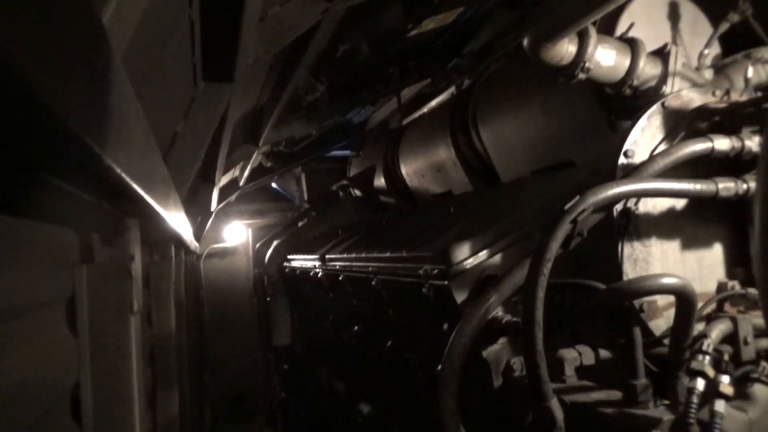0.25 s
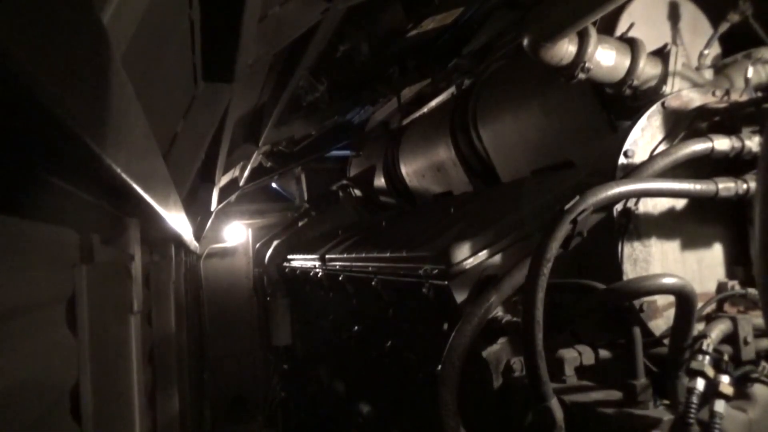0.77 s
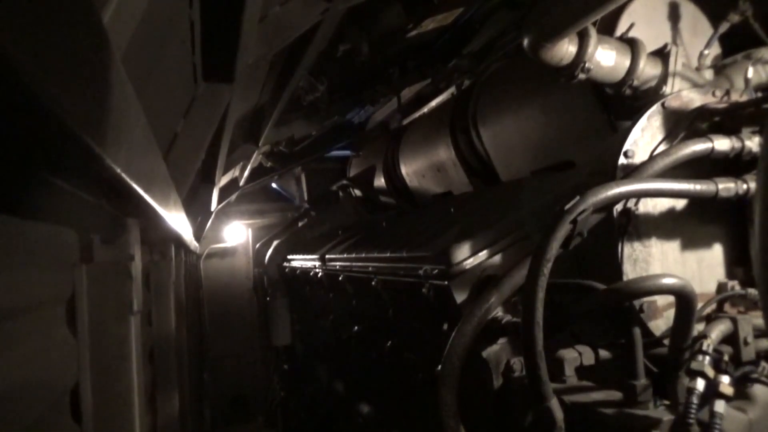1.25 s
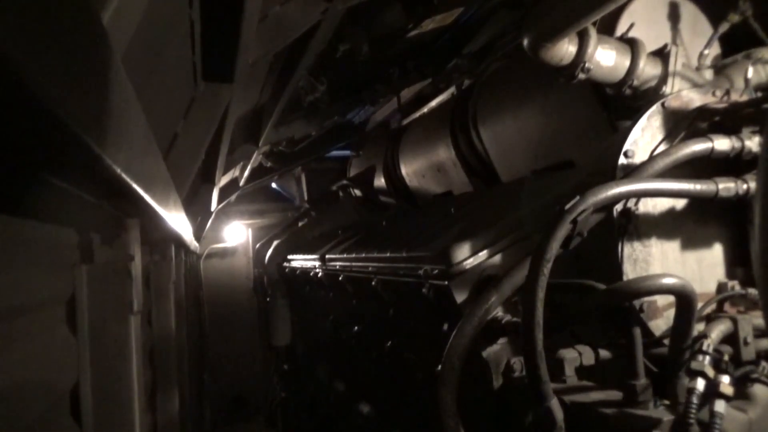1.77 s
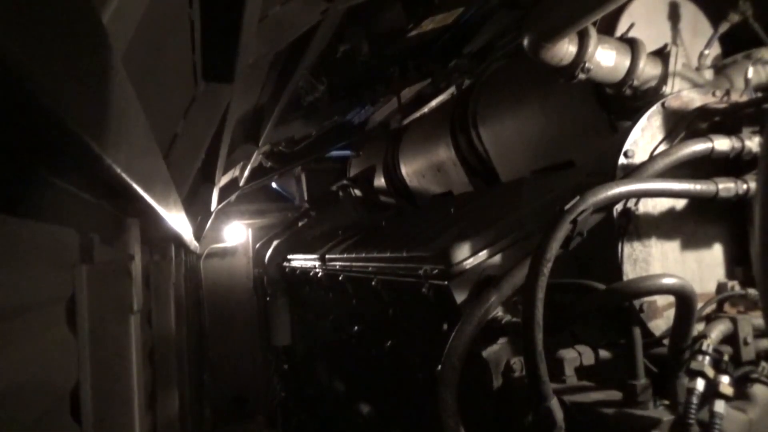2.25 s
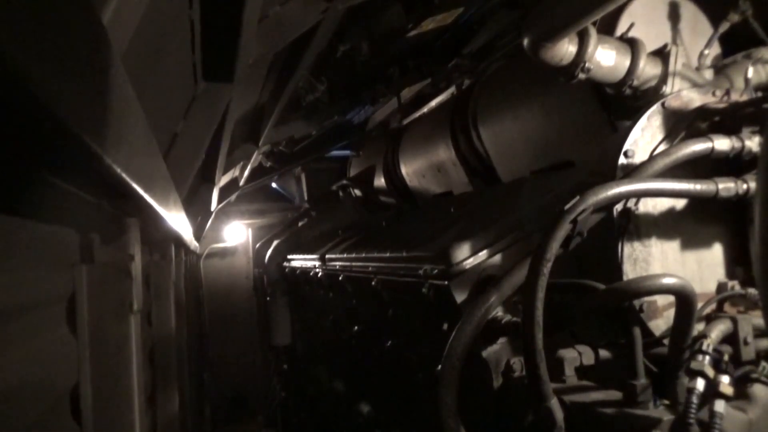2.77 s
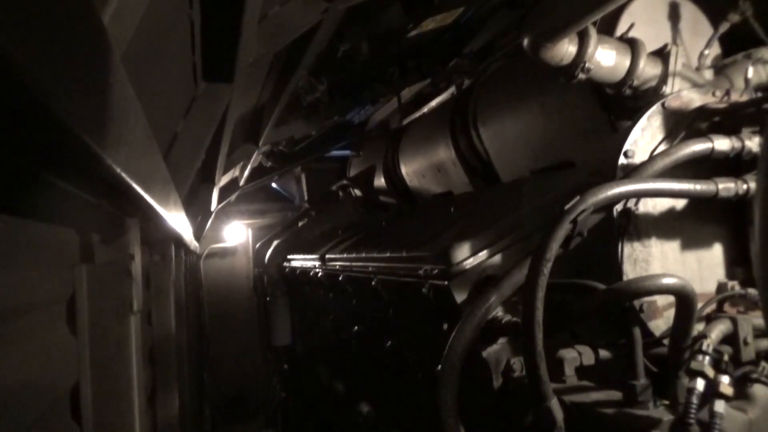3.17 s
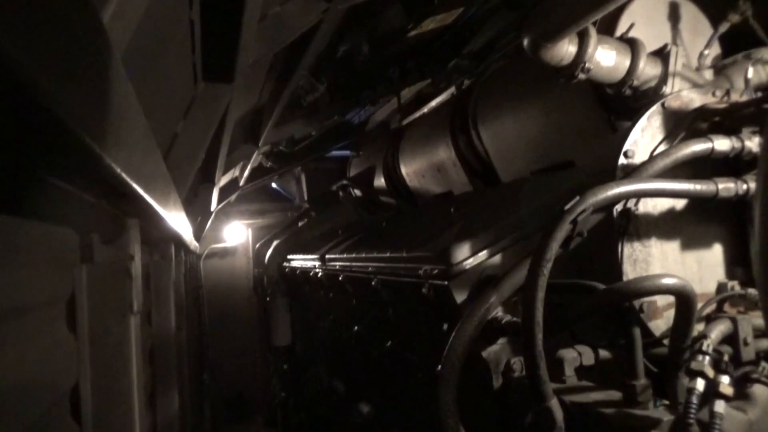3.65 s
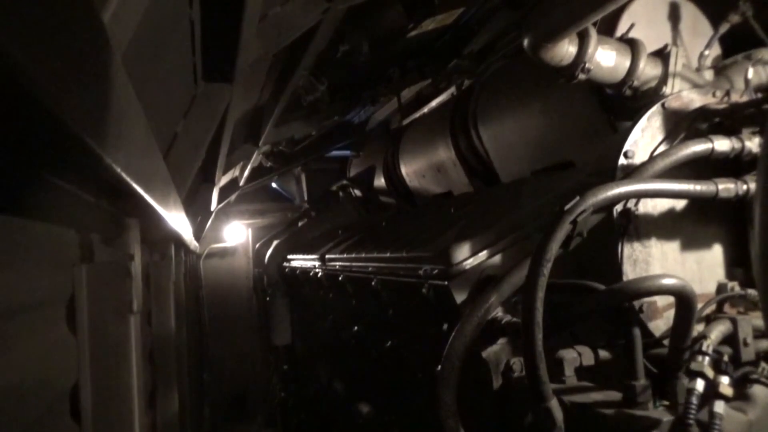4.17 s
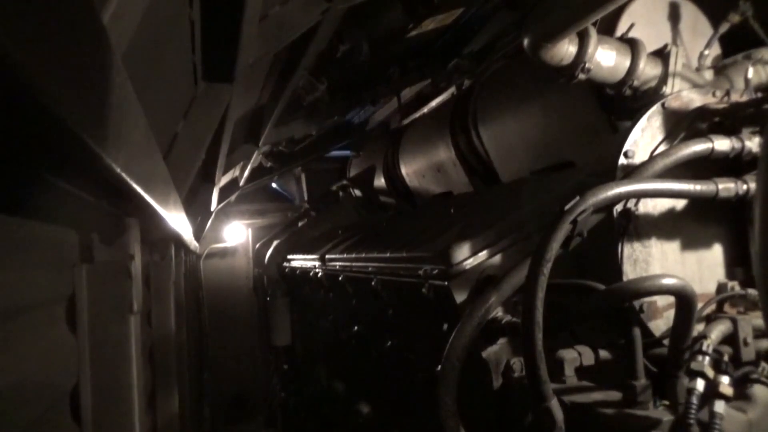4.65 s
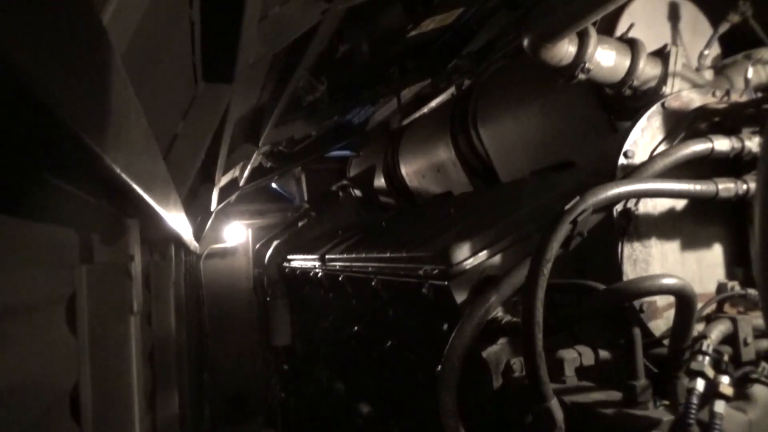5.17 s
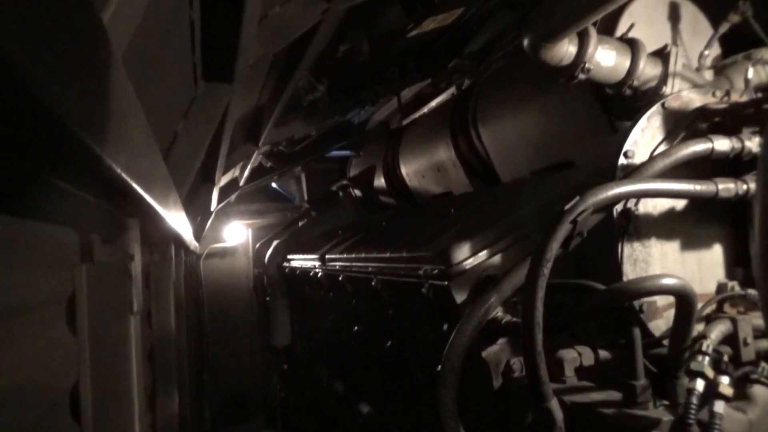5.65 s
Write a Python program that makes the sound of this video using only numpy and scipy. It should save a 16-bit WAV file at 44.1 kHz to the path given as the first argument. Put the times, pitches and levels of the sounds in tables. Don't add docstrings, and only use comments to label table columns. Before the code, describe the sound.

Inside a cramped steel engine room, a big diesel engine runs at constant speed. Its dense, buzzing mid-low drone pulses about eight times a second, with metallic clatter and rushing air between pulses. A thin, high blower whistle runs throughout, dipping briefly near the start, wavering, and growing strongest after four seconds. Faint pump whines sit beneath. A small close microphone sounds compressed, slightly muffled at the top, and never quiet.

```python
import sys
import numpy as np
from scipy import signal
from scipy.fft import irfft
from scipy.io import wavfile
from scipy.ndimage import uniform_filter1d

SR = 44100
rng = np.random.default_rng(int(sys.argv[2]) if len(sys.argv) > 2 else 0)


def level_to_linear(level):
    exponent = np.asarray(level, float) / 20
    return 10 ** exponent


def wav_record(signal):
    frames = np.transpose(np.atleast_2d(signal))
    bounded = np.clip(frames, -1, 1)
    quanta = np.round(bounded * 32767).astype(np.int16)
    wavfile.write(sys.argv[1], SR, quanta)


N = 260631

CYCLE_HZ = 8.1689
# f/Hz, lead/rad
LEAD = [(20, -1.2), (130, -0.5), (430, -1.01), (700, -1.05), (1000, -1.45), (1250, -.4), (1600, -.57),
        (4000, -.55), (6000, -.32), (11000, -.03)]
# f/Hz, difference/dB
LEAN = [(60, 0.0), (110, -0.5), (190, -1.0), (340, -0.3), (610, -0.5), (1080, 0.0), (1930, 0.0),
        (3450, 0.036), (6150, 0.09), (11000, 0.0)]
REGISTERS = [
    (16, 39),
    (39, 67),
    (67, 76),
    (75, 84),
    (84, 113),
    (67, 113),
]


def evened(x):
    return x / np.sqrt(np.mean(x ** 2) + 1e-20)


def read(points, hz):
    f, value = np.transpose(points)
    return np.interp(np.log(hz + 1), np.log(f + 1), value)


def around(steps, turns):
    return np.interp(turns, (np.arange(len(steps)) + .5) / len(steps), steps, period=1)


def drift(top_hz, count=30):
    t = np.arange(0, N + 64, 64) / SR
    slow = 0
    for f in np.geomspace(top_hz / 20, top_hz, count):
        slow = slow + np.sin(2 * np.pi * (f * t + rng.random())) / np.sqrt(f)
    return np.interp(np.arange(N) / SR, t, evened(slow))


def ports(lead_rad, lean_db):
    left = level_to_linear(lean_db / 2) * np.exp(.5j * lead_rad)
    return np.array([left, 1 / left]) / abs(left + 1 / left) * 2


def drone(turns, size=16384, scatter=.3):
    order = np.arange(size // 2 + 1)
    lines = order_levels(order) * np.exp(2j * np.pi * rng.random(len(order)))
    top = REGISTERS[-1][1]
    lines[:top] = settled(lines[:top])
    spread = scatter * np.clip(order / 130, 0, 1) ** 3
    lead_rad, lean_db = spread * rng.standard_normal((2, len(order)))
    hz = order * CYCLE_HZ
    placed = lines * ports(read(LEAD, hz) + lead_rad, read(LEAN, hz) + 3.6 * lean_db)
    angle = np.arange(size) / size
    hump = irfft(placed * (order < top))
    rattle = level_to_linear(1.3 * ducking(angle)) * irfft(placed * (order >= top))
    cycle = (hump + rattle) * size / np.sqrt(2)
    sound = np.array([np.interp(turns, angle, side, period=1) for side in cycle])
    return sound * level_to_linear(0.37 * drift(6.5))


def order_levels(order):
    hump_scatter_db, hump_top_order = 3., 300
    # f/Hz, level of one order/dB
    hump_colour = [(40, -69), (150, -54), (240, -56.5), (310, -46), (680, -40), (850, -45.5), (950, -55),
                   (2200, -66)]
    quiet_orders = [11, 12, 23, 35, 52, 58, 65, 91, 93, 98, 107, 112, 113, 124]
    # cycle order, level/dB
    standout_orders = [(9, -56), (18, -49), (24, -45), (25, -40), (28, -47), (32, -42), (33, -38), (34, -38),
                       (43, -41), (45, -39), (46, -36), (57, -37), (59, -34), (60, -35), (69, -35), (75, -34),
                       (76, -32), (81, -31), (84, -37), (85, -37), (89, -33), (90, -33), (99, -41), (101, -42),
                       (114, -43), (118, -47), (128, -53), (130, -49), (134, -50), (137, -45), (141, -51),
                   (143, -49), (146, -54), (167, -49), (192, -52), (194, -47), (199, -54), (200, -49),
                   (219, -57), (226, -52), (240, -51), (291, -60)]
    # cycle order, level/dB, order below/dB, order above/dB
    gear_orders = [
        (55, -38, -38, -32),
        (63, -34, -39, -38),
        (71, -30, -37, -32),
        (79, -23, -34, -24),
        (87, -26, -30, -31),
        (95, -36, -38, -44),
        (158, -39, -58, -60),
        (237, -51, -48, -47),
    ]
    uneven = np.clip(rng.standard_normal(len(order)), -2, 1)
    db = read(hump_colour, order * CYCLE_HZ) + hump_scatter_db * uneven
    db[quiet_orders] += -9
    for k, tone_db in standout_orders:
        db[k] = tone_db
    for k, *near_db in gear_orders:
        db[[k, k - 1, k + 1]] = near_db
    return level_to_linear(db) * (order >= 5) * (order < hump_top_order)


def settled(lines, size=256, count=24):
    # swells per cycle, depth/dB, crank angle of a swell/cycle
    throbs = [
        [(8, 2, 0), (3, 1.7, .183), (11, 1, .044), (10, 1, .089)],
        [(11, 1.9, .048), (14, 1.8, .067), (9, 1.8, .013), (8, 1.7, .014), (3, 1.6, .112), (2, 1.5, .485)],
        [(5, 2.3, .169), (1, 1.8, .021), (4, 1.4, .241), (9, 1.4, .024), (3, 1.3, .217)],
        [(1, 2.7, .363), (3, 2, .017), (2, 1.9, .067), (7, 1.4, .135)],
        [(14, 1.6, .018), (3, 1.4, .118), (8, 1, .11), (2, 1, .144)],
        [(7, 2.4, .132), (6, 1.6, .042), (16, 1.6, .018), (10, 1.6, .069), (11, 1.6, .075), (18, 1.2, .044),
         (1, 1.1, .307)],
    ]
    tries = lines * np.exp(2j * np.pi * rng.random((count, len(lines))))
    angle = np.arange(size) / size
    for _ in range(40):
        miss = np.zeros(count)
        for swells, (low, high) in zip(throbs, REGISTERS):
            wanted = evened(level_to_linear(throb(swells, angle))) * np.linalg.norm(lines[low:high]) / size
            wave = np.fft.ifft(tries[:, low:high], size)
            span = size // (2 * max(swells)[0])
            loud = np.sqrt(uniform_filter1d(abs(wave) ** 2, size=span, mode="wrap"))
            turned = np.fft.fft(wave * wanted / loud)[:, :high - low]
            tries[:, low:high] = abs(lines[low:high]) * np.exp(1j * np.angle(turned))
            miss += ((loud - wanted) ** 2).sum(1)
    return tries[np.argmin(miss)]


def throb(swells, turns):
    return sum(db * np.cos(2 * np.pi * k * (turns - at)) for k, db, at in swells)


def ducking(turns, size=512):
    grab_s, recover_turns = 0.0025, 0.11
    # crank angle/cycle, drop/dB
    trips = [
        (.03, -2.5),
        (.12, -1.1),
        (.23, -5.5),
        (.52, -2.6),
        (.67, -0.5),
        (.95, -2),
    ]
    angle = np.arange(size) / size
    db = sum(drop_db * np.exp(-((angle - at) % 1) / recover_turns) for at, drop_db in trips)
    grab = max(round(grab_s * CYCLE_HZ * size), 1)
    db = uniform_filter1d(db - db.mean(), size=grab, mode="wrap")
    return around(db, turns)


def rush(turns, patchy_db=0.5):
    # f/Hz, density/dB per Hz
    rush_colour = [(20, -78), (45, -86.5), (90, -72.5), (180, -63), (330, -64.5), (500, -55.5), (800, -56),
                   (1100, -65), (1700, -67), (2500, -69.5), (3600, -73.5), (4600, -77), (6000, -83),
                   (11000, -86)]
    # f/Hz, width/Hz, level over the rush/dB
    casings = [(189, 24, 4), (665, 136, 5), (951, 28, 7), (1112, 18, 9), (1305, 17, 14), (1930, 38, 7),
               (2090, 294, 5.5), (3840, 39, 6), (4120, 36, 9), (4202, 60, 8.5), (4340, 30, -10),
               (8380, 210, 6.5)]
    # f/Hz, shared power/1
    likeness = [(20, .7), (100, 0.74), (190, 0.8), (300, 0.38), (620, 0.96), (950, 0.93), (1250, 0.1),
                (1600, 0.8), (2200, 0.65), (3500, 0.77), (6000, 0.65), (9000, 0.78), (11000, 0.82)]
    frames, hz = N // 512 + 5, np.fft.rfftfreq(2048, 1 / SR)
    a, b, c, d, patches = rng.standard_normal((frames, len(hz), 5)).T
    patches = evened(uniform_filter1d(uniform_filter1d(patches, 20, 0), 4, 1))
    colour_db = read(rush_colour, hz)
    for f, width_hz, db in casings:
        colour_db = colour_db + db / (1 + ((hz - f) / (width_hz / 2)) ** 2)
    same = np.clip(read(likeness, hz), 0, 1)[:, None]
    shared = np.sqrt(same) * (a + 1j * b)
    apart = np.sqrt(1 - same) * (c + 1j * d)
    other = np.sqrt(1 - same) * np.roll(c - 1j * d, 7, 1)
    half = np.exp(.5j * read(LEAD, hz))[:, None]
    lean = level_to_linear(read(LEAN, hz) / 2)[:, None]
    z = np.array([(shared * half + apart) * lean, (shared / half + other) / lean])
    z *= level_to_linear(colour_db[:, None] + patchy_db * patches)
    noise = signal.istft(z, nperseg=2048, noverlap=1536)[1][:, :N]
    mid_power = np.sum(level_to_linear(2 * colour_db)) * hz[1]
    noise *= np.sqrt(mid_power / np.mean(noise.mean(0) ** 2))
    return noise * level_to_linear(1.6 * ducking(turns) + 0.35 * drift(30.) + .45 * drift(150.))


def blower(turns, sum_db=-65, double_db=-70):
    shaft_hz, blades = 95.69, 44
    partner_db, swell_at_turn = -45.5, -0.06
    flutter_hz, flutter_share, flutter_dip_s = 2.96, .4, .23
    below_start_db, below_rise_db_per_s = -48.5, 0.06
    # t/s, blade tone level/dB
    blade_effort = [(0, -40), (.3, -56), (.65, -40), (.95, -44.5), (1.2, -41), (1.45, -47), (1.65, -42.5),
                    (2.4, -42.5), (2.9, -39), (3.3, -47), (3.6, -40.5), (3.95, -43), (4.3, -37),
                    (4.55, -40.5), (5.0, -42), (5.3, -37), (5.55, -39), (5.91, -40)]
    # left lead/rad, left minus right/dB
    whistle_place = [
        (-0.39, -5),
        (-0.7, -2.5),
        (-1.05, 13),
    ]
    weak_orders = (10, 20, 40, 45, 86)
    # level/dB rms, share of partner tone/1, left minus right/dB
    weak_tones = [(-49.5, 0.09, -3), (-47, .3, 1), (-66, 0.36, -2), (-82, .3, 0), (-78, .3, 0)]
    t = np.arange(N) / SR
    tone_db = np.interp(t, *np.transpose(blade_effort))
    below_db = below_start_db + below_rise_db_per_s * t + 1.1 * drift(4.)
    flutter = 1 - flutter_share * np.exp(2j * np.pi * flutter_hz * (t - flutter_dip_s))
    partner = level_to_linear(partner_db + 1.1 * drift(3.5)) * flutter
    shaft = np.cumsum(shaft_hz * (1 + 0.00011 * drift(2.98))) / SR
    beat = np.exp(2j * np.pi * (turns - swell_at_turn))
    blade = np.exp(2j * np.pi * blades * shaft)
    below = level_to_linear(below_db) * (1 + 0.53 * beat) * np.exp(2j * np.pi * (blades - 1) * shaft)
    main = [level_to_linear(tone_db + 0.38 * drift(21.0)) * blade, partner * beat * blade, below]
    out = sum(ports(*place)[:, None] * tone for place, tone in zip(whistle_place, main))
    double = (1 + 0.4 * beat) * blade ** 2
    under_double = double * np.exp(-2j * np.pi * shaft)
    out += ports(-0.61, 2.)[:, None] * under_double * level_to_linear(sum_db + 7.3 * drift(45.))
    out += ports(-.55, -3.)[:, None] * double * level_to_linear(double_db + 7.1 * drift(45.))
    for k, (db, share, lean_db) in zip(weak_orders, weak_tones):
        wave = np.exp(2j * np.pi * (k * shaft + rng.random()))
        tone = level_to_linear(db + 2.8 * drift(8.)) * (1 + share * beat) * wave
        out += ports(read(LEAD, k * shaft_hz), lean_db)[:, None] * tone
    return np.sqrt(2) * out.real


def pumps(turns):
    # f/Hz, level/dB rms, left minus right/dB
    pump_tones = [(958, -52, 7), (1288, -49, 4), (1917, -57, 0), (3800, -63, 5), (4000, -71, 0),
                  (4600, -67, 6), (5808, -75, 2), (6944, -61.5, 9), (7680, -62, -7)]
    out = np.zeros((2, N))
    for hz, db, lean_db in pump_tones:
        phase = 2 * np.pi * np.cumsum(hz + 0.94 * drift(4.89)) / SR
        tone = level_to_linear(db + 2.0 * drift(6.6)) * np.exp(1j * phase)
        out += np.sqrt(2) * (ports(read(LEAD, hz), lean_db)[:, None] * tone).real
    return out * level_to_linear(ducking(turns))


def masked(x, over_db=-42, chance_db=3.0):
    hz, _, z = signal.stft(x, SR, nperseg=1024, noverlap=768)
    blade_band = z.mean(0)[(hz > 4170) & (hz < 4260)]
    tone_db = 10 * np.log10((abs(blade_band) ** 2).sum(0) + 1e-12)
    luck = np.repeat(rng.standard_normal(len(tone_db)), 6)[:len(tone_db)]
    loud = tone_db + chance_db * luck > over_db
    drop = loud * ((hz > 4310) & (hz < 4570))[:, None]
    return signal.istft(z * (1 - .985 * drop), SR, nperseg=1024, noverlap=768)[1][:, :N]


def scene():
    turns = CYCLE_HZ * np.arange(N) / SR + .0008 * drift(2.)
    return drone(turns) + rush(turns) + blower(turns) + pumps(turns)


def top_cut(x):
    return signal.sosfilt(signal.butter(12, 11570, fs=SR, output="sos"), x)


def record(dry):
    held = dry / (1 + (abs(dry) / .6) ** 6) ** (1 / 6)
    edge = signal.firwin(1023, 11080, window=("kaiser", 10), fs=SR)
    mix = signal.oaconvolve(masked(held), edge[None], "same")
    return top_cut(mix)


dry = scene()
out = record(dry)
wav_record(out)
```